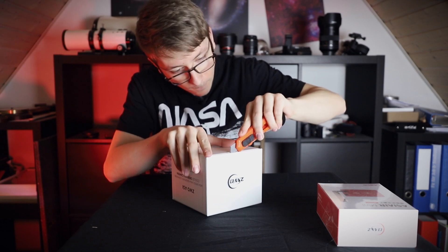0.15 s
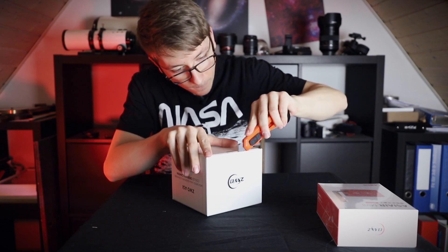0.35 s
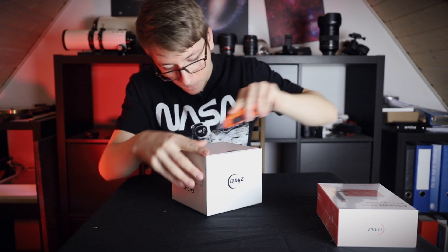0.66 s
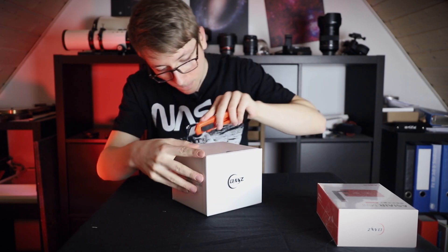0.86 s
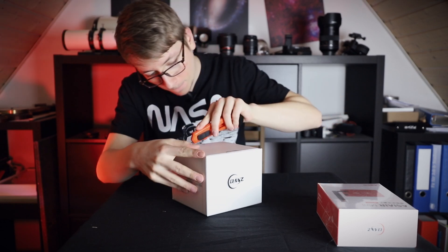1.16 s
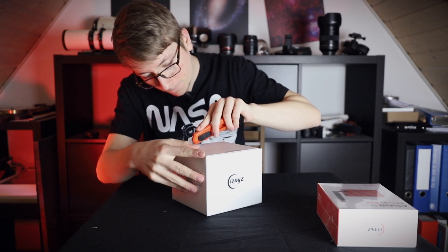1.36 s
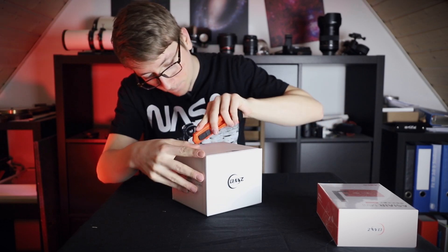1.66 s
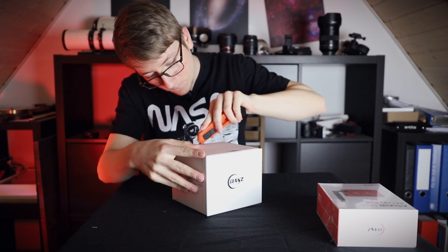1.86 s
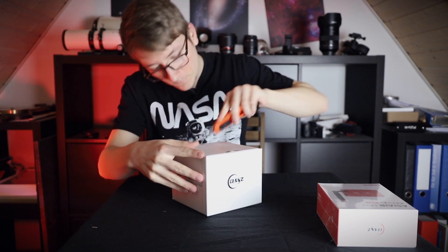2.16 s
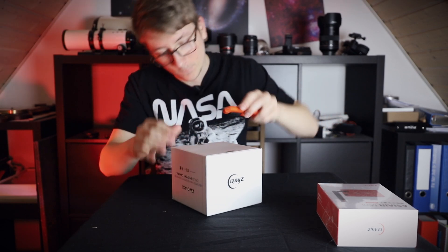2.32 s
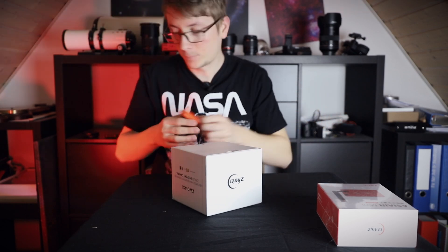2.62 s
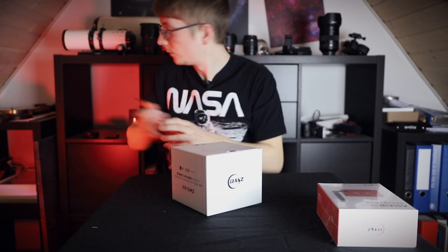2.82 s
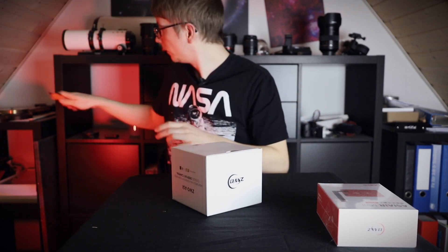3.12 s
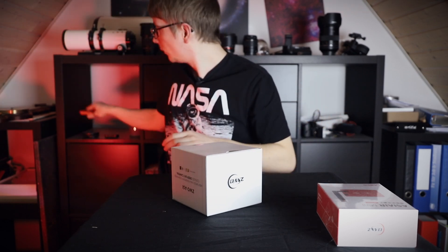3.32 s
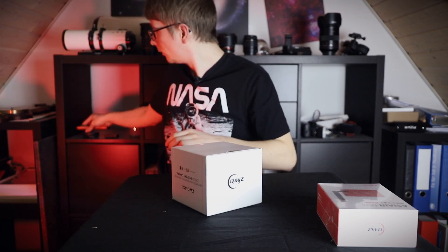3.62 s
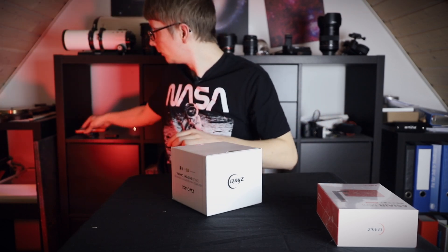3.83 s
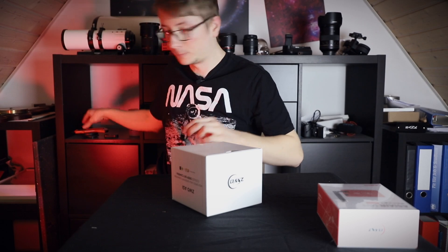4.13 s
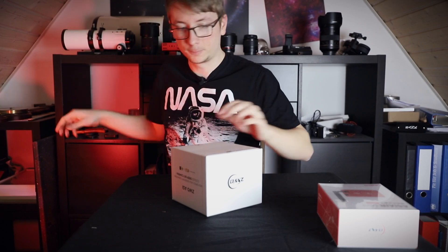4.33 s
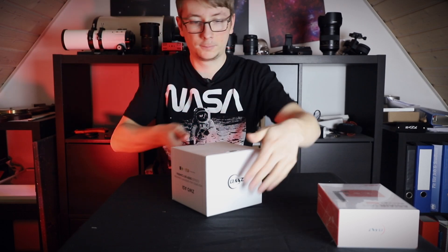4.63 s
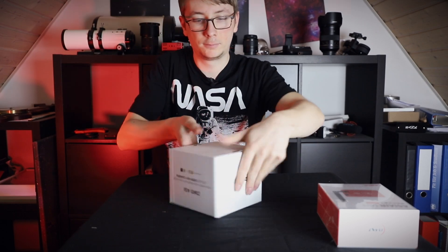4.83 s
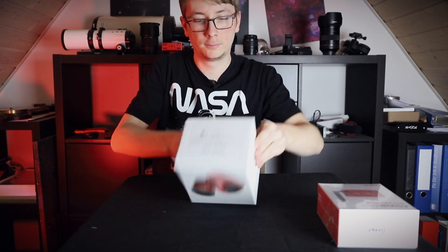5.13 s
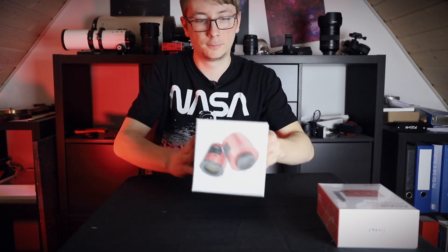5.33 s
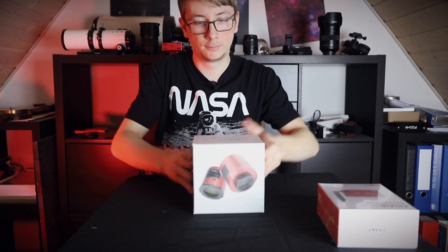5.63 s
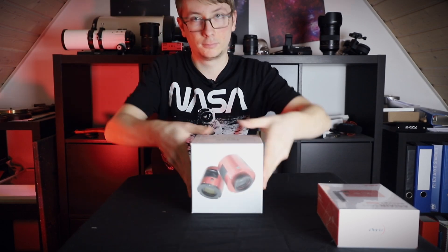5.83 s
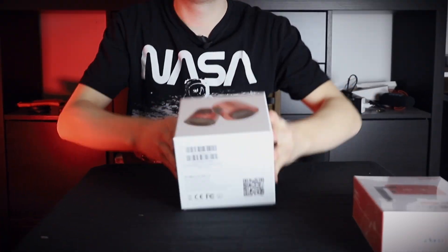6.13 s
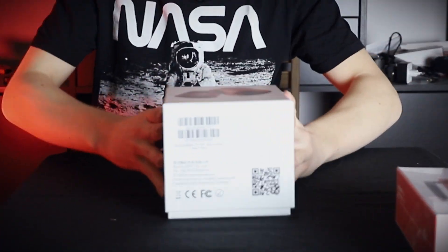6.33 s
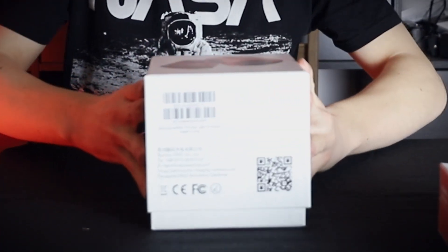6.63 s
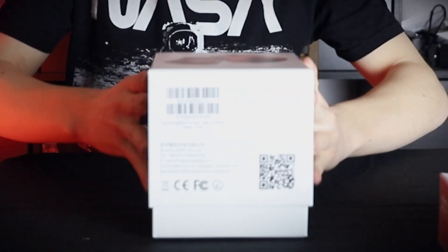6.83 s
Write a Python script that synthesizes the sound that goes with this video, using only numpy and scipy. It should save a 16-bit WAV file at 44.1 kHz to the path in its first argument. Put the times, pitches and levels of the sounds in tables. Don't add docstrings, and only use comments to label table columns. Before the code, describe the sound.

In a quiet furnished room, close to one microphone, a knife bites through a small box's seal with crisp ticks and soft hollow taps. The blade clicks shut, sleeves rustle, and the knife clatters onto a shelf farther off. The box is turned with quick hard knocks, thumped down on the table, and its tight lid finally rasps and squeaks upward.

```python
import sys
import numpy as np
from scipy import signal
from scipy.fft import rfft, irfft, next_fast_len
from scipy.io import wavfile
from scipy.ndimage import uniform_filter1d

SR = 44100
rng = np.random.default_rng(int(sys.argv[2]) if len(sys.argv) > 2 else 0)


def store_wav(level_fs):
    pcm = np.round(np.clip(np.atleast_2d(level_fs), -1, 1) * 32767)
    wavfile.write(sys.argv[1], SR, pcm.T.astype(np.int16))


def convert_level_to_amplitude(level_db):
    exponent = np.asarray(level_db, float) / 20
    return 10 ** exponent


N = 307377
SPAN = SR // 8


def unit(x):
    return x / np.sqrt(np.mean(x ** 2) + 1e-20)


def along(points, hz):
    f, v = np.transpose(points)
    return np.interp(np.log(hz + 1), np.log(f + 1), v)


def gains(rows):
    s, *columns = np.transpose(rows)
    t = np.arange(N) / SR
    return convert_level_to_amplitude([np.interp(t, s, c, -120, -120) for c in columns])


def wobble(rate):
    knots = rng.standard_normal(int(N * rate / SR) + 4)
    return np.interp(np.arange(N) * rate / SR, np.arange(len(knots)), knots)


def filtered(x, response):
    m = next_fast_len(N + SR // 2)
    return irfft(rfft(x, m) * response(np.fft.rfftfreq(m, 1 / SR)), m)[..., :N]


def resonate(x, modes):
    def body(f):
        total = 0
        for k, (centre, width, db) in enumerate(modes):
            loss = 1j * f * width
            total = total + (-1) ** k * convert_level_to_amplitude(db) * loss / (centre * centre - f * f + loss)
        return total

    power = np.mean(abs(body(np.linspace(0, SR / 2, 4000))) ** 2)
    return filtered(x, body) / np.sqrt(power)


def grit(per_s, spread_db, share, clump_db):
    chance = rng.random(N)
    size = np.minimum(rng.exponential(size=N), 3)
    grains = (chance < per_s / SR) * convert_level_to_amplitude(spread_db * size) * rng.choice([-1, 1], N)
    share = np.clip(share, 0, 1)
    mix = np.sqrt(share) * unit(grains) + np.sqrt(1 - share) * rng.standard_normal(N)
    return unit(convert_level_to_amplitude(clump_db * wobble(60)) * mix)


def strokes(rows, release, shape, bands_db):
    s, db, swell, bright_db = np.transpose(rows)[:, :, None]
    late = (np.arange(0, N + 64, 64) / SR - s) / swell
    fall = np.where(late < 0, -late, late / release) ** shape
    power = convert_level_to_amplitude(db - 10 * fall) ** 2
    out = []
    for tilt, band_db in zip(np.linspace(-1, 1, len(bands_db)), bands_db):
        gain = np.sqrt((power * convert_level_to_amplitude(tilt * bright_db + band_db) ** 2).sum(0))
        out.append(np.repeat(gain, 64)[:N])
    return out


def rubbed(rows, release, shape, drag, bands):
    envelopes = strokes(rows, release, shape, bands_db=[.1, -1.5, .1])
    return sum(resonate(g * drag, band) for g, band in zip(envelopes, bands))


def tilted(rows, sides_db, *rest):
    return [(s, db, sides_db - b, sides_db + b, *more, *rest) for s, db, b, *more in rows]


def cracks(events, bands, t60, level_db):
    force, t = np.zeros((3, N + SPAN)), np.arange(SPAN) / SR
    for s, db, low_db, high_db, tearing_s in events:
        burst = rng.standard_normal(SPAN) * convert_level_to_amplitude(-60 * np.maximum(t - tearing_s, 0) / t60)
        bands_db = np.array([[low_db], [0], [high_db]])
        force[:, round(s * SR):][:, :SPAN] += convert_level_to_amplitude(level_db + db + bands_db) * burst
    return sum(resonate(f[:N], band) for f, band in zip(force, bands))


# start_s, level_db, brightness_db, tearing_s
BITES = [(0.0217, -30, 2, 0.0031), (0.0465, -36.5, -3, 0.011), (0.0572, -31, -2, 0.002),
         (.0615, -29.5, -3, 0.0046), (0.155, -46, -1, 0.0021), (0.4236, -39.5, 2.5, 0.0014),
         (0.433, -41, 1, 0.0028), (.258, -50, -6, .001), (.382, -50, -3, .001), (.445, -50, 6, .001),
         (.685, -51, -5, .002), (0.783, -47, -4.5, 0.00086), (0.8024, -33, -6, 0.0006),
         (.846, -48, -4, .001), (.873, -52, -3, .001), (.939, -49, -8, 0.0008), (1.151, -58, -6, 0.00087),
         (1.2565, -37.5, -3, 0.0042), (1.3518, -19.5, -2.5, 0.0033), (1.3528, -23, 12, 0.00036),
         (1.3542, -20, 6, 0.00035), (1.3557, -15.5, 10, .0004), (1.4339, -43, -2.5, 0.0052),
         (1.5221, -30, 4, 0.0013), (1.6598, -43, 1, 0.0028), (1.7355, -28, 2, 0.003),
         (1.7388, -28, -13.5, 0.0011), (1.7418, -25.5, -4, 0.0029), (1.7465, -23.5, -2, 0.0014),
         (2.0861, -25.5, -4, 0.00048), (2.1996, -47.5, -1.5, 0.017), (2.2636, -51.5, -4.5, 0.011)]
# start_s, level_db, brightness_db
CLICKS = [
    (2.4112, -37, -9),
    (2.519, -49, -7),
    (2.5405, -20, 0),
    (2.548, -38, -7),
    (2.568, -27, -5),
    (2.574, -38, -15),
]
# peak_s, level_db, swell_s, brightness_db
CUT = [(.27, -64, 0.072, -10.5), (.36, -56.5, 0.08, -1.5), (.52, -71, 0.17, -10), (1.25, -81, 1, -10.5),
       (2.0, -62.5, 0.17, -8.5), (2.12, -57.5, 0.15, -1.5), (2.32, -73, .3, -3),]
# centre_hz, width_hz, level_db
BLADE = [
    [(1720, 460, 0), (2780, 1500, -7)],
    [(5100, 2350, 2.5), (6900, 2400, 10.5), (7580, 6200, 5.5)],
    [(8540, 220, -35), (11340, 890, 8), (12200, 1300, 2.5)],
]
# centre_hz, width_hz, level_db
SEAL = [
    [(1840, 500, 1), (2170, 640, 0.5), (2800, 560, -2.5)],
    [(4020, 540, 10.5), (6060, 440, 11.5), (7240, 1000, 8.5)],
    [(8900, 620, 4), (11700, 980, 7)],
]
# centre_hz, width_hz, level_db
SLIDER = [
    [(3140, 170, 0), (2300, 1400, -10)],
    [(4320, 500, -12), (5660, 170, 0), (6450, 900, -12)],
    [(7520, 500, -1), (8960, 600, -3), (12200, 3000, -6)],
]


def knife():
    drag = grit(1500, spread_db=3, share=.15, clump_db=1.5)
    scratch = rubbed(CUT, 0.44, 2.8, drag, SEAL)
    bites = cracks(tilted(BITES, 1), BLADE, t60=0.0081, level_db=-6.5)
    clicks = cracks(tilted(CLICKS, -4.5, 0.0001), SLIDER, t60=0.002, level_db=-2.5)
    return scratch + bites + clicks


# start_s, peak_db
DROPS = [(3.783, -16), (3.839, -7.5), (3.8416, -4), (3.8458, 3), (3.8492, 5), (3.857, -7), (3.897, -3),
         (3.899, -1), (3.9231, -7), (3.943, -1), (3.947, -11.5), (3.9604, -7.5), (3.975, -11), (4.002, -21),
         (4.0402, -15)]
# peak_s, level_db, swell_s, brightness_db
RATTLE = [(3.81, -54.5, 0.032, -8.5), (3.87, -50, 0.017, 1), (3.89, -42.5, 0.058, -7),
          (3.95, -34, 0.035, 2), (3.985, -40.5, 0.038, -2), (4.03, -44, 0.071, -0.5)]
# pitch_hz, level_db, t60_s
HANDLE = [(1650, -7, .012), (2110, -1, 0.022), (2590, -1, 0.016), (2935, 3.5, 0.012), (3340, 0, 0.011),
          (4170, -2, 0.013), (4600, -6, 0.007), (5600, -9, 0.0075), (9200, -11, 0.011),
          (12800, -18.5, 0.012)]
# centre_hz, width_hz, level_db
SHELF = [(113, 19, 3), (226, 38, 1.5), (600, 75, -2.5), (1000, 370, -4), (1450, 650, -12)]


def drop():
    ring, crash, drum = np.zeros((3, N + SPAN))
    t = np.arange(SPAN) / SR
    for s, db in DROPS:
        modes = np.zeros(SPAN)
        for hz, mode_db, t60 in HANDLE:
            decay = convert_level_to_amplitude(mode_db + rng.normal(0, 2.5) - 60 * t / t60)
            modes += decay * np.sin(2 * np.pi * hz * rng.normal(1, .045) * t + rng.uniform(0, 6))
        crack = rng.standard_normal(SPAN) * (1 - np.exp(-t / 0.00098))
        at = round(s * SR)
        ring[at:][:SPAN] += convert_level_to_amplitude(db - 14) * (1 - np.exp(-t / .001)) * modes
        crash[at:][:SPAN] += convert_level_to_amplitude(db - 17 - 60 * t / 0.013) * crack
        drum[at:][:SPAN] += convert_level_to_amplitude(db - 25.5 - 60 * t / 0.06) * crack
    rattle = np.array(strokes(RATTLE, 0.41, 5.0, bands_db=[.1, -.1]))
    shelf, handle = rattle * grit(1200, spread_db=3.5, share=.55, clump_db=2.5)
    chatter = resonate(handle + crash[:N], [(hz, 32 / t60, db + 1.5) for hz, db, t60 in HANDLE])
    return ring[:N] + chatter + resonate(drum[:N] + shelf, SHELF)


# start_s, peak_db, pitch_hz, walls_re_peak_db
TAPS = [(0.06, -19, 258, -9.5), (.0655, -36, 295, -24), (0.172, -44, 219, 1), (.812, -46, 1000, -14),
        (.829, -33, 430, -12), (.845, -45, 890, -7), (.862, -40.5, 480, -2), (1.197, -40.5, 265, -4),
        (1.216, -50, 990, -6), (1.308, -52.5, 1000, 0), (1.362, -62, 1140, -16), (0.366, -36, 290, -24),
        (0.432, -26.5, 304, -17), (0.58, -35.5, 430, -9.5), (0.994, -38.5, 266, -11),
        (1.003, -40, 265, -10), (1.187, -38, 230, -1), (1.205, -46, 970, -13), (2.27, -51, 290, 4),
        (3.23, -38, 190, -6), (.69, -37, 150, -11), (1.431, -34.5, 278, -9), (1.744, -23.5, 302, -3),
        (2.032, -33.5, 262, -11), (2.085, -15.5, 290, -14), (2.894, -37, 360, -3), (2.924, -30, 227, 2),
        (2.929, -42, 910, -8), (2.938, -34, 280, 5), (2.946, -37, 250, 1), (2.957, -45, 1080, -14),
        (4.192, -36.5, 257, -12), (4.254, -36, 236, -11)]
# start_s, peak_db, pitch_hz, walls_re_peak_db
TURNS = [(4.771, -37.5, 226, 1), (4.904, -22, 113, -30), (4.9335, -26.5, 450, -20), (4.9602, -27, 550, -4),
         (4.9625, -13, 228, -22), (5.0302, -17, 405, -17), (5.0415, -30, 435, -13), (5.178, -27, 480, -25),
         (5.169, -16.5, 437, -11), (5.2403, -16, 480, -17), (5.247, -38, 674, 5), (5.2545, -18, 684, -9),
         (5.2635, -12, 600, -12), (5.2685, -11.5, 540, -7), (5.3052, -14.5, 670, -6),
         (5.317, -22.5, 570, -4)]
# start_s, peak_db, pitch_hz, walls_re_peak_db
THUMPS = [(5.561, -17.5, 360, -21), (5.5645, -10.5, 161, -19.5), (5.571, -27.5, 446, 3),
          (5.582, -23, 327, -15), (5.609, -31, 317, -23), (5.843, -41.5, 304, 3), (5.979, -21, 155, -29),
          (6.024, -28, 332, -10.5), (6.075, -13, 310, -3.5), (6.082, -11.5, 156, -3), (6.129, -30, 670, 4),
          (6.252, -26, 676, -3.5), (6.281, -15, 222, -7), (6.294, -15.5, 323, -9.5), (6.43, -11, 180, -15),
          (6.352, -38, 230, -15), (6.4385, -23, 212, -4), (6.483, -28.5, 239, -9), (6.572, -38, 306, -8),
          (6.628, -38.5, 407, -12), (6.844, -32.5, 272, -4), (6.883, -29.5, 284, -9)]
# start_s, peak_db, pitch_hz, walls_re_peak_db
RAPS = [
    (0.8021, -13, 550, -6),
    (2.8768, -30, 520, -7.5),
    (5.2163, -4.5, 610, -19),
    (5.2223, -2.5, 500, -15.5),
]
# peak_s, level_db, swell_s, brightness_db
HANDLING = [(.4, -54, 1, -2), (2.05, -59, 0.79, -2), (2.95, -55.5, 0.5, -2.5), (3.35, -60, 0.25, -2),
            (4.1, -48, 0.2, -4), (4.68, -50.5, 0.14, 1), (4.95, -47, 0.34, -1), (5.34, -46, 0.15, 3.5),
            (5.64, -43.5, 0.11, -4), (6.03, -55.5, 0.11, -15.5), (6.14, -37, 0.18, 1),
            (6.32, -31, 0.079, -0.5), (6.5, -42.5, 0.18, 3.5), (6.9, -54.5, 0.97, -0.5)]
# centre_hz, width_hz, level_db
PANELS = [(440, 132, 4.5), (786, 523, 3), (1100, 570, 3), (1710, 1164, -2), (2150, 1630, -6.5)]
# centre_hz, width_hz, level_db
TABLE = [(102, 170, -0.3), (256, 130, 3.5)]
# centre_hz, width_hz, level_db
WALL = [(470, 133, 2.5), (637, 155, 2), (885, 564, -3)]


def box():
    out, shudder = np.zeros((2, N + SPAN))
    t = np.arange(SPAN) / SR
    for rows, t60 in ((TAPS, 0.017), (TURNS, 0.017), (THUMPS, 0.014), (RAPS, 0.0068)):
        for s, db, hz, walls_db in rows:
            contact = 1 - np.exp(-(t * hz / 0.37) ** 2)
            ring = convert_level_to_amplitude(-60 * t / t60) * np.sin(2 * np.pi * hz * t)
            ring += convert_level_to_amplitude(-6.0 - 60 * t / (2.33 * t60)) * np.sin(2 * np.pi * 0.942 * hz * t)
            at = round(s * SR)
            out[at:][:SPAN] -= convert_level_to_amplitude(db + 5.5) * contact * ring
            decay = convert_level_to_amplitude(db + walls_db + 1.5 - 55 * t / (t60 + 0.018))
            shudder[at:][:SPAN] += decay * contact * rng.standard_normal(SPAN)
    table, wall = strokes(HANDLING, 0.8, 1.17, bands_db=[.1, -.1])
    rub = grit(400, spread_db=5.5, share=0.28, clump_db=5.0)
    rubbing = resonate(table * rub, TABLE) + resonate(wall * rub, WALL)
    return out[:N] + resonate(shudder[:N], PANELS) + convert_level_to_amplitude(-1.75) * rubbing


# time_s, slips_per_s
JUDDER = [(6.358, 820), (6.37, 770), (6.386, 780), (6.396, 915), (6.406, 925), (6.416, 1090), (6.432, 1170)]
SQUEAK = [(6.54, 780), (6.572, 890), (6.586, 860), (6.62, 975), (6.634, 955), (6.654, 1170), (6.68, 1050),
          (6.702, 610), (6.728, 650)]
SQUEAL = [(6.744, 1230), (6.758, 1660), (6.77, 1715), (6.794, 1610), (6.815, 1950), (6.827, 1850),
          (6.845, 2240), (6.856, 2680)]
FADE = [(6.864, 2600), (6.879, 2420), (6.89, 2240), (6.908, 2340), (6.922, 1860), (6.944, 1130),
        (6.956, 1270), (6.97, 1360)]


def slip_motion():
    s, rate = np.transpose(JUDDER + SQUEAK + SQUEAL + FADE)
    steady = np.interp(np.arange(N) / SR, s, rate)
    glide = uniform_filter1d(steady, size=250) * (1 + .018 * wobble(130) + .026 * wobble(700))
    return glide, 2 * np.pi * np.cumsum(glide) / SR, np.log2(steady / 1000)


# time_s, level_db
BITE = [(6.358, -10), (6.39, -4), (6.405, -2), (6.43, -3), (6.436, -40)]
# time_s, level_db
GRIP = [(6.53, -12), (6.58, -6), (6.62, -0.5), (6.642, -3), (6.658, 4), (6.685, -1.5), (6.74, -1),
        (6.77, 4.5), (6.78, 1), (6.8, 2), (6.86, 5.5), (6.892, 3), (6.908, 3.5), (6.93, 0), (6.945, 0.5),
        (6.97, -3.5)]
# time_s, level_db
SHRILL = [(6.35, 7), (6.5, 6), (6.797, -7), (6.81, -1), (6.85, 3.5), (6.872, -2), (6.89, -1), (6.97, 7)]
# centre_hz, width_hz, level_db
RIDGE = (2480, 260, 5)
# centre_hz, width_hz, level_db
LID = [(2100, 480, -0.5), (2370, 110, 4.5), (2644, 62, 6.5), (3250, 440, 0), (3940, 380, 3),
       (4390, 320, 4.5), (5500, 450, -1), (6460, 350, 0.5), (7200, 810, 0.5), (8100, 870, 2),
       (9200, 660, -4), (10250, 1130, 3), (12600, 1650, 5), (14700, 1900, 3)]


def squeak(glide, slips, octaves):
    grip = convert_level_to_amplitude(-39) * (gains(BITE) + gains(GRIP))[0]
    on = round(JUDDER[0][0] * SR)
    overtones, spikes = np.zeros((2, N))
    for k in range(2, 19):
        hz = k * glide[on:]
        heard = hz < 16000
        phase = k * slips[on:]
        level = convert_level_to_amplitude(6 * wobble(140)[on:] - .5 * k)
        overtones[on:] += heard * level * np.sin(phase + .05 * k ** 1.5 * wobble(600)[on:])
        edge = np.exp(-(hz / 9000) ** 2) * np.tanh((hz / 2600) ** 2)
        spikes[on:] += heard * edge * np.cos(phase)
    centre_hz, width_hz, ridge_db = RIDGE
    ridge = ridge_db * np.exp(-((glide - centre_hz) / width_hz) ** 2)
    tone = grip * convert_level_to_amplitude(3.5 * wobble(200) + ridge) * np.cos(slips)
    pushes = grip * convert_level_to_amplitude(-9 * abs(octaves) + 3.5 * wobble(900)) * spikes
    shrill, = gains(SHRILL)
    ringing = resonate(grip * overtones, LID[:8]) + shrill * resonate(grip * overtones, LID[-3:])
    return tone + pushes + convert_level_to_amplitude(-7 + 4 * octaves) * ringing


# time_s, pressure_db
JERK = [(6.353, -60.5), (6.36, -34), (6.43, -31), (6.442, -44), (6.48, -46)]
# time_s, pressure_db
SLIDE = [(6.481, -47), (6.49, -33), (6.52, -36.5), (6.57, -30.5), (6.66, -29), (6.74, -30), (6.84, -27),
         (6.9, -27.5), (6.97, -30)]


def rasp(slips, octaves):
    fast = np.maximum(octaves, 0)
    pressure, = gains(JERK) + gains(SLIDE)
    scrape = pressure * convert_level_to_amplitude(-6 * fast)
    hiss = scrape * convert_level_to_amplitude(-2 + 9.5 * fast)
    drag = grit(3700, spread_db=2, share=0.4, clump_db=1.5) * (1 + 0.7 * np.cos(slips))
    return convert_level_to_amplitude(-4.5) * (resonate(scrape * drag, LID[:-3]) + resonate(hiss * drag, LID[-3:]))


def lid():
    glide, slips, octaves = slip_motion()
    return squeak(glide, slips, octaves) + rasp(slips, octaves)


# peak_s, level_db, swell_s, brightness_db
RUSTLE = [(.665, -57.5, 0.016, -3), (2.742, -71.5, 0.044, -13.5), (2.9, -52, 0.093, -4),
          (3.08, -61.5, 0.86, -3.5), (3.182, -44, 0.035, 2), (3.33, -46, 0.072, 2),
          (3.43, -48.5, 0.056, 3.5), (3.49, -42.5, 0.03, 1), (3.57, -48.5, 0.098, 4), (4.11, -50, 0.15, 0),
          (4.282, -56.5, 0.39, 2), (4.69, -45, 0.082, -0.5), (4.86, -51.5, 0.094, 0),
          (4.97, -45, 0.039, -1), (5.3, -68, 0.13, -7), (5.69, -51, 0.021, 4), (5.759, -52, 0.024, 1),
          (5.93, -63.5, 0.94, 1), (6.33, -41.5, 0.03, 1)]
# start_s, level_db, brightness_db
SNAPS = [(2.8453, -36, 8), (2.9118, -21, 1), (2.9575, -30.5, 1), (2.9722, -34, -16.5), (3.1798, -37, -5),
         (3.233, -31.5, -8), (3.3295, -25, 6), (3.375, -24, 5), (3.4712, -18, 4), (3.4835, -16.5, 1.5),
         (3.5013, -17, 3), (3.5668, -22.5, 1), (4.1928, -24.5, -2), (4.2407, -23, -0.5), (4.3063, -33, 5)]
# start_s, level_db,
# brightness_db
TICKS = [(2.7025, -44, -9), (2.7295, -35.5, -8), (2.744, -34, -8.5), (4.6166, -38, -9), (4.7096, -32, -10),
         (4.799, -24, -0.5), (4.8699, -18.5, -1.5), (4.9028, -18.5, -0.5), (4.9617, -22.5, -5),
         (5.2687, -15, -8), (5.3062, -30.5, -16), (5.3746, -39, -3), (5.6822, -41, 14.5),
         (5.8736, -30.5, -11.5), (5.9958, -24, -2), (6.0763, -36, -13), (6.129, -37, -19),
         (6.1765, -21.5, -6), (6.0785, -28, -5), (4.757, -35, 4), (4.85, -43, -1), (4.865, -25.5, -3),
         (4.879, -28, 4), (4.91, -38, 0), (4.951, -35, 6), (4.974, -31, 6), (4.987, -25, -1),
         (5.072, -38, -9), (5.205, -34, -6), (5.217, -37, -3), (5.224, -41, -7), (4.043, -29, 9.5),
         (4.058, -22, -1), (4.097, -35, -4)]
# centre_hz, width_hz, level_db
CLOTH = [
    [(1320, 4240, -2), (2540, 1870, 4.5)],
    [(5780, 2170, -4.5), (6660, 1140, 3)],
    [(9100, 5900, 16), (14300, 3000, 16)],
]


def cloth():
    drag = grit(420, spread_db=5.5, share=.7, clump_db=2.5)
    rustle = rubbed(RUSTLE, 0.27, 0.84, drag, CLOTH)
    snaps = tilted(SNAPS, -4, 0.00068) + tilted(TICKS, 0, 0.00032)
    return rustle + cracks(snaps, CLOTH, t60=0.0083, level_db=-13.0)


# peak_s, level_db, swell_s, brightness_db
SWEEP = [(0.599, -54, 0.049, 4), (.77, -63, 0.092, 3), (4.96, -57, .06, -3), (5.06, -53, 0.25, 2.5),
         (5.19, -51.5, 0.068, 2), (6.095, -48, 0.054, 0), (6.13, -52, 0.046, -14),
         (6.284, -44.5, 0.032, -4)]
# start_s, level_db, brightness_db, tearing_s
PEEL = [(6.2585, -30.5, -4, 0.0019), (6.2635, -23.5, 1, 0.0016), (6.2705, -36, -4, 0.00076),
        (6.2735, -24, -2, 0.0017), (6.279, -29, 2, 0.0081), (6.316, -37.5, -3, .001), (6.32, -38, -5, .001),
        (6.331, -37, -4, 0.0065), (6.14, -39, 3, .001), (6.21, -39, -1, .001), (6.1765, -27.5, 0, 0.00082)]
# centre_hz, width_hz, level_db
GLOSS = [
    [(9050, 950, 0)],
    [(10400, 1100, 0)],
    [(12000, 2000, -22), (14500, 3600, 21)],
]
# start_s, end_s, pitch_hz, level_db
CHIRP = (5.165, 5.2, 9750, -56)


def gloss():
    drag = grit(2500, spread_db=2, share=.15, clump_db=1.5)
    sweep = rubbed(SWEEP, 0.42, 1.8, drag, CLOTH)
    start, end, hz, db = CHIRP
    t = np.arange(N) / SR
    swell = np.sin(np.pi * np.clip((t - start) / (end - start), 0, 1))
    chirp = convert_level_to_amplitude(db + 2.5 * wobble(200)) * swell * np.sin(2 * np.pi * hz * t + 1.2 * wobble(300))
    return sweep + chirp + cracks(tilted(PEEL, 0.1), GLOSS, t60=0.0065, level_db=-4.5)


# pitch_hz, t60_s
ROOM = [(150, 0.18), (600, 0.15), (2500, 0.23), (6000, 0.17), (14000, 0.16)]


def room(x):
    hz, t, z = signal.stft(rng.standard_normal((3, SR // 2)), SR, nperseg=256)
    hz = hz[:, None]
    decay = convert_level_to_amplitude(-60 * t / along(ROOM, hz)) / (1 + (hz / 9000) ** 2)
    tails = signal.istft(z * decay, SR, nperseg=256)[1]
    turn = np.pi * (np.arange(N) / SR / .11 + np.arange(3)[:, None]) / 3
    parts = np.pad(x * np.sqrt(2 / 3) * np.cos(turn), ((0, 0), (250, 0)))
    return signal.fftconvolve(parts, tails / np.linalg.norm(tails[0]), axes=1).sum(0)[:N]


# pitch_hz, level_db_per_hz
FLOOR = [(25, -35), (49, 2), (102, -2.5), (301, -11.5), (416, -16.5), (3430, -18.5), (4250, -24.5),
         (16000, -18)]


def background():
    return convert_level_to_amplitude(-59) * unit(filtered(rng.standard_normal(N), lambda hz: convert_level_to_amplitude(along(FLOOR, hz))))


def scene():
    near = knife() + cloth() + gloss() + box() + lid()
    far = drop()
    events = near + far + room(convert_level_to_amplitude(-13.0) * near + convert_level_to_amplitude(-10) * far)
    mono = filtered(events, lambda hz: (1j * hz / (1j * hz + 85)) ** 2) + background()
    hiss = resonate(rng.standard_normal(N), [(40, 79, 2.0), (500, 3400, -12.0), (10700, 5500, -10.5)])
    apart = convert_level_to_amplitude(-70.0) * hiss
    return np.array([mono + apart, mono - apart])


def roll_off(x):
    return signal.sosfilt(signal.butter(12, 17010, fs=SR, output="sos"), x)


def record(dry):
    mix = filtered(dry, lambda hz: hz < 15780)
    return roll_off(mix)


dry = scene()
out = record(dry)
store_wav(out)
```